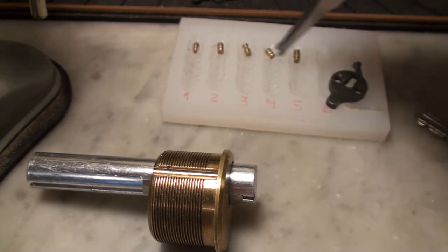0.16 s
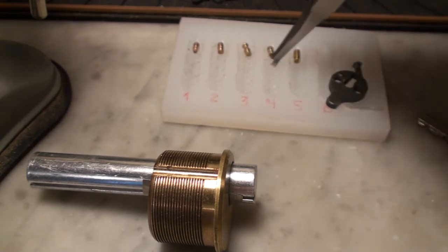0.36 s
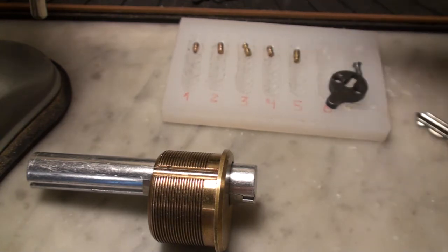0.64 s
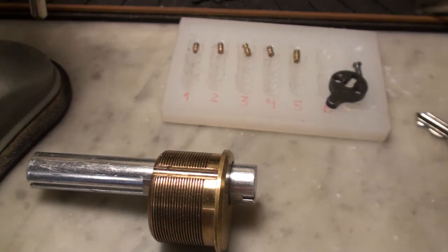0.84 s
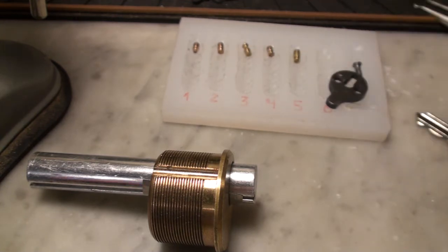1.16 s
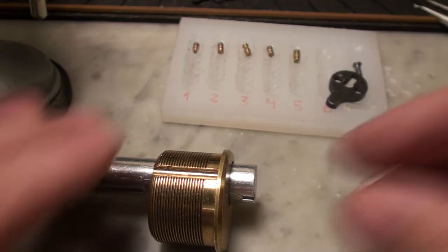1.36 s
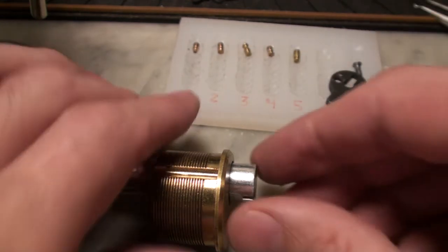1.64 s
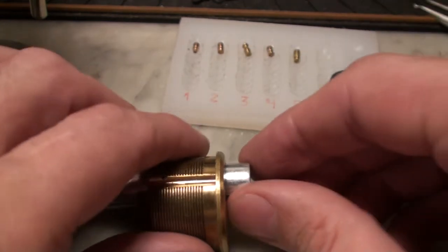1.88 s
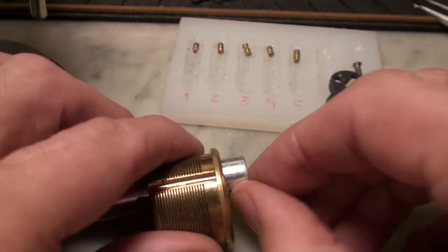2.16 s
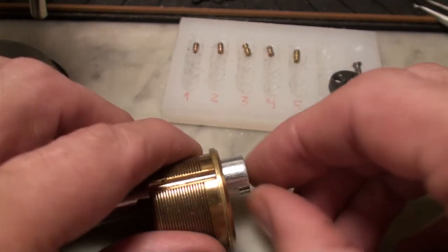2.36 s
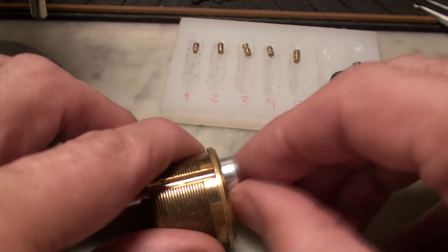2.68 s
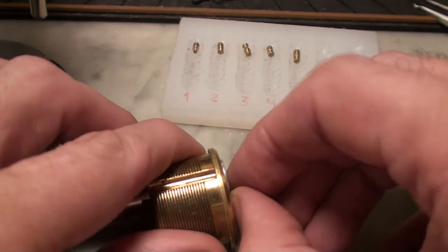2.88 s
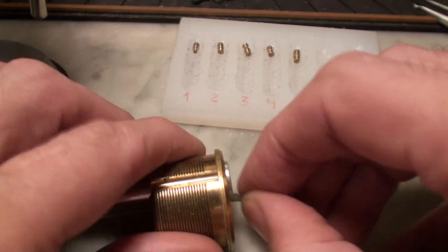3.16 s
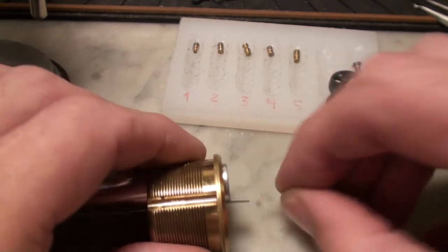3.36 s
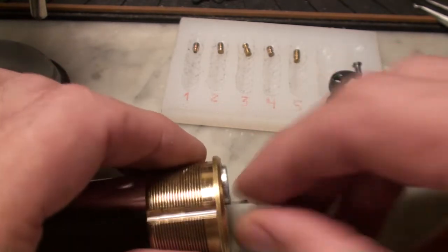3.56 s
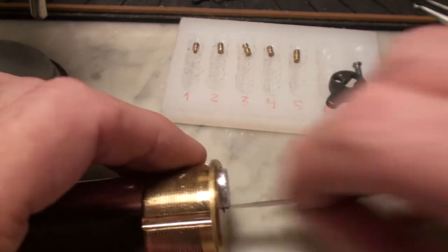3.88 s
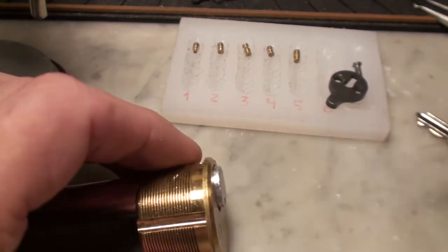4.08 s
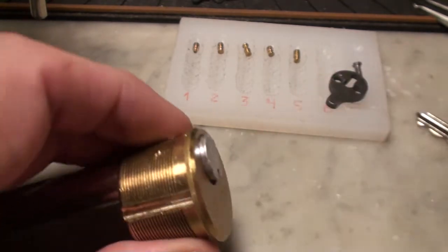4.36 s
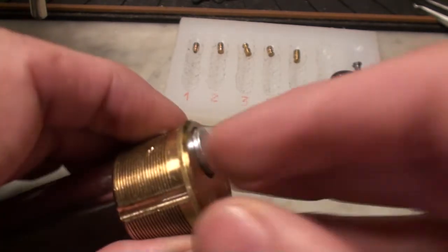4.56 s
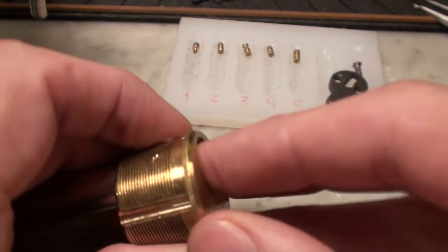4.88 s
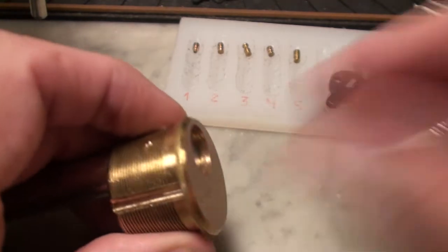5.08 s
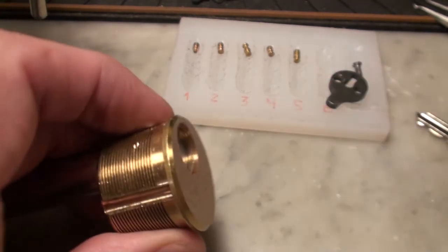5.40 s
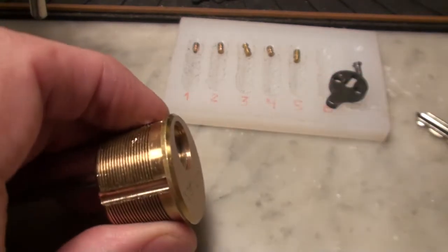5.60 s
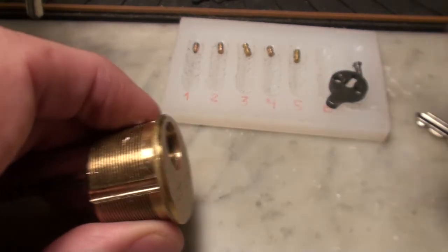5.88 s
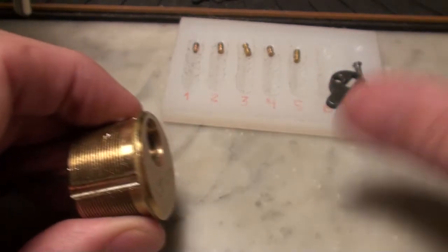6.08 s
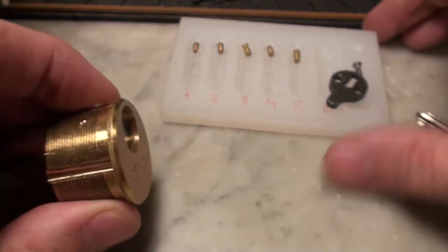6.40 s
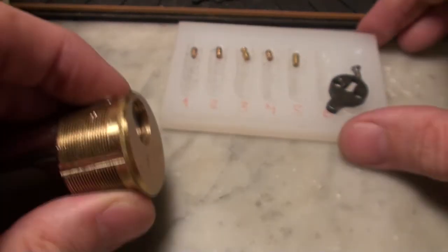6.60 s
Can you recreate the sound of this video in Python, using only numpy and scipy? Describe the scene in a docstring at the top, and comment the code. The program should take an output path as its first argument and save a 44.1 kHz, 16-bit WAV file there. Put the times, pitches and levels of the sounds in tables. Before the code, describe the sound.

Steady soft hiss, a faint fluttering fan whistle and low hum fill a small, lightly reflective room, heard close, with handling leaning right. Tiny bright tweezer ticks on plastic come at 0.3-0.45 s; skin lands dully on stone at 0.65 and brushes away. At 1.09-1.13 tweezers drop in a rapid, very bright ringing clatter, the loudest event. From 1.8 to 3.4 there are only faint finger-slip chirps, little clicks and thin metal rubs. At 3.87-3.96 sprung pins snap in a dry, crisp burst inside brass. A thin steel shim skitters over stone at 4.2-4.37. A barely audible low drone peaks near 4.5, then fades among faint touches. At 5.84-6.13 a plastic tray grinds forward, growing with gritty ticks; a shorter push follows at 6.27-6.38. A key clinks at 6.52-6.55 and faintly at 6.63.

```python
"""Close-up work on a brass lock cylinder over a stone bench in a small quiet room, a fan murmuring throughout.
Tweezer tips tick a pin into a plastic tray, a hand brushes the bench and the tweezers drop ringing on stone.
Fingers slip, brass rubs on steel, sprung pins snap in the cylinder and a tossed steel shim skitters to rest.
A soft drone swells and fades; last, the tray grinds away in two pushes and nudges a key.
Metal is ringing modes plus noise clacks; skin and grit are coloured noise; room reflections follow."""
import sys
import numpy as np
from scipy import signal
from scipy.fft import rfft, irfft
from scipy.io import wavfile
from scipy.ndimage import uniform_filter1d

SR = 44100
rng = np.random.default_rng(int(sys.argv[2]) if len(sys.argv) > 2 else 0)


def file_out(sig):
    """Save sig as 16-bit WAV at sys.argv[1]."""
    # one column per channel
    cols = np.atleast_2d(sig).T
    # limit, then scale
    lim = np.clip(cols, -1, 1)
    pcm = np.round(lim * 32767).astype(np.int16)
    wavfile.write(sys.argv[1], SR, pcm)


N = 297234
T = np.arange(N) / SR  # s

# Levels are relative: each source's own gains and pan follow. Left_right_db below 0 leans right.
# room air and microphone hiss: hz, level_db (per Hz)
AIR_SPECTRUM = [(12, -38.5), (20, -7), (49, 0), (113, -10), (154, -9), (301, -9), (328, -9), (558, -7),
                (642, -9), (738, -5.5), (1060, -7), (1220, -7), (1370, -9), (9670, -24), (16000, -30.5)]
# stereo lean of the room air: hz, left_right_db
AIR_LEAN = [(60, -22.5), (110, -15.5), (200, -2.5), (380, 2.5), (700, 3), (1290, 4.5), (2380, 4.5),
            (4400, 1.0), (8120, 1), (15000, -18)]
# touches of tweezer tips, pins, key and tray:
# start_s, click_db, click_centre_hz, ping_db, main_mode_hz, second_mode_hz, ping_t60_s
LIGHT_TOUCHES = [(0.3, -49, 8000, -47, 5900, 11150, .022), (0.329, -62, 7000, -57, 5940, 11150, .018),
                 (0.364, -58, 8000, -59, 5900, 11150, .015), (0.438, -62, 6000, -60, 5900, 11150, .015),
                 (0.87, -50, 1500, -45, 700, 2100, 0.013), (2.306, -51, 6500, -47, 6270, 10000, 0.015),
                 (2.463, -59, 4980, -58, 6200, 9900, .015), (2.705, -52, 2480, -51, 5800, 6370, .05),
                 (4.8927, -53, 3480, -49, 1000, 7400, 0.022), (5.453, -62, 4820, -53, 4910, 8330, .08),
                 (5.594, -51.5, 2500, -50.5, 3800, 4700, .04), (5.842, -40, 4400, -39, 5700, 1520, .018),
                 (5.863, -51, 5040, -52, 1520, 4440, .015), (5.891, -51, 6500, -44, 9600, 10300, 0.045),
                 (5.916, -51, 5500, -51, 9600, 12120, .03), (5.996, -47, 6500, -48, 7400, 11800, .02),
                 (6.0173, -45.5, 7000, -39, 6150, 11800, .03), (6.028, -49, 7000, -46, 10400, 12120, .05),
                 (6.116, -43.5, 7000, -39, 12080, 10400, .055),
                 (6.2736, -33.5, 4440, -37, 1600, 12700, .016), (6.283, -36.5, 5600, -43, 3300, 7400, .02)]
# skin on stone: hz, level_db (per Hz)
SKIN_SPECTRUM = [(50, -15.5), (100, -2.5), (200, -4.5), (350, 0.5), (700, -6), (2000, -11.5), (7000, -24.5),
                 (14000, -41.5)]
# tweezers bouncing on the stone: start_s, level_db, favoured_hz
TWEEZER_CONTACTS = [(1.0858, -14, 4450), (1.093, -12, 14400), (1.1035, -15, 8300), (1.108, -14.5, 4900),
                    (1.126, -21, 6400)]
# tweezer ringing: pitch_hz, level_db, t60_s (before the sustain factor), left_right_db
TWEEZER_RING = [(1130, -31, .13, -5), (2550, -23, .04, -8), (3110, -27, .08, -11), (3887, -32, .17, -11),
                (4350, -23, .15, -14), (4520, -21, .06, -10), (4902, -20, .17, -4), (5895, -25, .12, -16),
                (6862, -24, .19, -17), (7936, -13, .15, -7), (8281, 3, .13, -11), (8485, -14, .14, -9),
                (8752, -25, .16, -9), (9061, -20, .17, -13), (9343, -14, .16, -9), (11290, -22, .14, -4),
                (12185, -20, .13, -16), (13450, -23, .13, -19), (14345, -1, .1, -16),
                (14436, -16, .13, -18), (14692, -13, .14, -17)]
# dry clack of the tweezers: hz, level_db (per Hz)
TWEEZER_CLACK_SPECTRUM = [(60, -24.5), (120, -4), (220, -10), (700, 0), (2500, -2), (4500, 4.5),
                          (6500, -2.5), (8500, 5.5), (10200, -20), (11500, -3.5), (14700, 2.5),
                          (15400, -24.5)]
# dull bumps on the bench as tweezers, tray and key land or knock, and one as the cylinder's plug clicks:
# start_s, level_db, top_hz
BENCH_BUMPS = [(1.105, -46, 134.4), (4.893, -46, 490), (5.591, -56, 110.6), (6.362, -46.5, 261),
               (6.531, -52, 108), (6.626, -51.5, 92.5)]
# soft slips of skin and plastic, and one squeak of the cylinder's plug at 2.713 s: middle_s, level_db,
# pitch_hz, length_s, octave_db
GRIP_SLIPS = [(1.807, -49, 760, 0.026, -14), (2.713, -44.5, 1370, 0.019, -15),
              (3.259, -46, 747, 0.023, -18), (3.274, -52, 728, .012, 0), (3.287, -41.5, 730, 0.021, -20),
              (3.335, -47, 781, 0.019, -9), (3.348, -47, 752, .018, -11), (3.373, -53, 780, .022, -7),
              (6.025, -45.5, 685, 0.026, -15), (6.107, -42, 660, .04, -15),
              (6.383, -43.5, 340.4, .05, -6.5)]
# metal rubbing faintly inside the cylinder: start_s, level_db
CYLINDER_RUBS = [(1.992, -66.5), (2.68, -55), (4.775, -61), (4.82, -60.5), (5.416, -57)]
# brass on steel: hz, level_db (per Hz)
BRASS_SPECTRUM = [(2000, -17), (5500, -6), (8500, -14), (9700, -6), (11000, -13), (16000, -30)]
# sprung pins snapping in the cylinder: start_s, level_db, loss_per_rebound_db, favoured_hz
PIN_SNAPS = [(3.8651, -50, 4, 6960), (3.8922, -16.5, 7, 8300), (3.9012, -30, 9, 13000),
             (3.9215, -25.5, 8, 6700), (3.9344, -21.5, 5, 10300), (3.9372, -22, 20, 5250),
             (3.947, -36, 7, 5100), (3.959, -30.5, 8, 5460)]
# pin and cylinder ringing: pitch_hz, level_db, t60_s (before the sustain factor), left_right_db
PIN_RING = [(1050, -23, .022, -5), (3170, -10, .016, -9), (4300, -11, .016, -9), (5150, -9, .03, -9),
            (5560, -14, .03, -9), (6150, -9, .035, -8), (6900, -6, .02, -10), (7420, -11, .02, -9),
            (8170, -7, .016, -7), (8520, -10, .016, -7), (9400, -7, .025, -3), (9600, -5, .03, -3),
            (10250, -7, .035, -1), (11280, -9, .03, 0), (12100, -13, .03, -5)]
# dry clack of the pins: hz, level_db (per Hz)
PIN_CLACK_SPECTRUM = [(180, -68), (300, -39), (1100, -15), (1410, -35), (1970, -18.5), (2570, -17.5),
                      (3130, -13), (4160, -13.5), (6850, -4), (8790, -16), (10000, -11), (14000, -15),
                      (16000, -26)]
# shim landing and skittering to rest: start_s, level_db, loss_per_rebound_db, favoured_hz
SHIM_LANDINGS = [(4.1995, -42, 9, 8500), (4.2035, -33.5, 7, 11640), (4.214, -38, 10, 4650),
                 (4.2195, -30, 0.5, 11640), (4.23, -34, 3, 6500), (4.244, -37, 3, 11640),
                 (4.289, -40, 8, 13200), (4.3025, -38, 9, 4500), (4.3065, -39.5, 6, 13000),
                 (4.3135, -43, 5, 15500), (4.325, -43, 10, 2960), (4.342, -47, 10, 4100),
                 (4.3665, -43, 12, 14200)]
# shim ringing: pitch_hz, level_db, t60_s (before the sustain factor), left_right_db
SHIM_RING = [(2864, -24, .15, -8), (3430, -27, .15, -8), (4210, -23, .08, -10), (4650, -15, .05, -11),
             (6050, -10, .15, -16), (6160, -16, .12, -14), (7430, -9, .18, -12), (8134, -8, .12, -18),
             (8530, -18, .15, -7), (10180, -16, .15, -5), (10455, -12, .15, -2), (10902, -12, .14, -1),
             (11640, -4, .11, -17), (12360, -19, .13, -18), (13390, -14, .13, -17), (14705, -16, .13, -20),
             (15600, -7, .12, -22)]
# dry clack of the shim: hz, level_db (per Hz)
SHIM_CLACK_SPECTRUM = [(200, -25), (2000, -22), (5000, 1), (8000, 8), (9400, -11), (11500, 6), (13300, 3),
                       (14100, -11), (15600, -14)]
# pushes sliding the tray over stone: start_s, stop_s, friction_db (at the stop), swell_db_per_s
TRAY_PUSHES = [(5.843, 6.128, -46.5, 28), (6.274, 6.376, -47, -29)]
# grit under the tray: hz, level_db (per Hz)
GRIT_SPECTRUM = [(530, -30), (900, -16), (1230, 0), (1770, -7), (5550, -7), (6110, -7), (9650, -16.5),
                 (12000, -14), (16000, -28)]
# the tray's hollow body: hz, level_db (per Hz)
BODY_SPECTRUM = [(80, -6), (330, -6.5), (480, -9.5), (680, 0.5), (900, -6.5), (1400, -39.5), (4000, -60)]
# the key knocked by the tray: start_s, level_db, loss_per_rebound_db, favoured_hz
KEY_KNOCKS = [(6.5202, -27, 2.5, 12600), (6.532, -27, 5.5, 10000), (6.5435, -30, 11, 3960),
              (6.625, -37, 1.5, 1300)]
# key ringing: pitch_hz, level_db, t60_s (sustain factor 1), left_right_db
KEY_RING = [(1300, -11, .06, -3), (2920, -12, .04, -7), (3760, -5, .035, -8), (3890, -5, .035, -8),
            (4380, -13, .035, -8), (6551, -10, .12, -5), (6840, -16, .13, -8), (7660, -14, .06, -6),
            (8516, -8, .08, -1), (8726, -7, .08, -13), (10030, -2, .045, 1), (11290, -3, .065, 2),
            (11760, 3.5, .048, -5), (13003, 0, .045, -5), (14560, 0, .06, -10)]
# dry clack of the key: hz, level_db (per Hz)
KEY_CLACK_SPECTRUM = [(150, -19), (350, 10.5), (600, -5), (1300, 3), (4000, 1.5), (7000, 5.5), (9500, -4),
                      (10700, -22), (11400, -6), (12600, 1), (13800, -22), (16000, -30)]
# decay of the room's reflections: hz, t60_s
ROOM_DECAY = [(100, 0.35), (1000, 0.28), (5000, 0.32), (9000, 0.26), (15000, 0.23)]

PIN_REBOUND_S, SHIM_REBOUND_S, KEY_REBOUND_S = .0027, .0062, .0056
RESTITUTION = .92  # each rebound lasts this share of the one before
FAVOUR_OCTAVES = .15  # a contact spot most excites the modes this near its favoured pitch
TICK_WIDTH = .676  # a click's width as a share of its centre
RUB_S = .07
BUMP_CYCLES = 37  # a bump falls 60 dB in this many cycles of its top frequency
PUSH_RISE_DB_PER_S, PUSH_FALL_DB_PER_S = 348, 302
BODY_DB, BODY_SWELL_DB_PER_S = -49, 28  # the hollow body speaks more as each push goes on
BRUSH_S, BRUSH_DB, BRUSH_RISE_DB_PER_S, BRUSH_FALL_DB_PER_S = .652, -53.5, 250, 18.5
DRONE_PEAK_S, DRONE_DB, DRONE_RISE_DB_PER_S, DRONE_FALL_DB_PER_S = 4.52, -66, 12, 6
AIR_DB = -54.87
LOW_CUT_HZ, EDGE_HZ = 36, 16150


def amp(db):
    """Decibels to gain."""
    return 10 ** (np.asarray(db) / 20)


def evened(x):
    """Scales to rms 1."""
    return x / np.sqrt(np.mean(x ** 2) + 1e-20)


def read(points, hz):
    """Reads a table on a log-frequency axis."""
    f, value = np.transpose(points)
    return np.interp(np.log(hz + 1), np.log(f + 1), value)


def pan(side_db):
    """Left and right gains with a mean of 1."""
    gains = np.array([amp(side_db), np.ones_like(side_db)]).reshape(2, -1)
    return gains / gains.mean(0)


def add(mix, s, sound):
    """Mixes a sound in at time s, cut at the end of the mix."""
    part = mix[..., round(s * SR):][..., :sound.shape[-1]]
    part += sound[..., :part.shape[-1]]


def noise(size, alike):
    """Two channels of white noise; alike is the share of power they have in common."""
    z = rng.standard_normal((3, size))
    return np.sqrt(alike) * z[2] + np.sqrt(1 - alike) * z[:2]


def colour(x, points):
    """Filters by a spectrum, keeping the power of white noise."""
    gain = evened(amp(read(points, np.fft.rfftfreq(2 * N, 1 / SR))))
    return irfft(rfft(x, 2 * N) * gain)[..., :N]


def resonate(x, hz, width):
    """One fixed resonance, width in Hz."""
    return signal.lfilter(*signal.iirpeak(hz, hz / width, SR), x)


def swell(start, stop, db, rise, fall, slope=0):
    """Gain that rises until start, drifts to db at stop, then falls; rates in dB per s."""
    held = db + slope * (np.clip(T, start, stop) - stop)
    return amp(held - rise * np.maximum(start - T, 0) - fall * np.maximum(T - stop, 0))


def room_air():
    """Air and microphone hiss as coloured noise with a different stereo lean in each band."""
    lean = pan(read(AIR_LEAN, np.fft.rfftfreq(N, 1 / SR)))
    air = irfft(rfft(colour(noise(N, 0.22), AIR_SPECTRUM)) * lean, N)
    return amp(AIR_DB) * evened(air)


def fan(whistle_hz=1210, whistle_width=80, whistle_db=-65, hum_hz=87, hum_width=12, hum_db=-70):
    """A fan's fluttering whistle and low hum, both narrow resonances fed by noise."""
    waves = sum(np.sin(2 * np.pi * (hz * T + rng.random())) for hz in np.geomspace(1.5, 14, 16))
    flutter = amp(3 * evened(waves))  # 3 dB rms
    whistle = resonate(noise(N, 0.36), whistle_hz, whistle_width)
    whistle = resonate(whistle, whistle_hz, 4 * whistle_width)
    hum = resonate(resonate(noise(N, 0.7), hum_hz, hum_width), hum_hz, hum_width)
    whistle = amp(whistle_db) * pan(2) * evened(flutter * whistle)
    return whistle + amp(hum_db) * pan(-13) * evened(hum)


def drone(hz=156.5, side_db=-14.5):
    """A soft low sine that swells and fades."""
    level = swell(DRONE_PEAK_S, DRONE_PEAK_S, DRONE_DB, DRONE_RISE_DB_PER_S, DRONE_FALL_DB_PER_S)
    return pan(side_db) * level * evened(np.sin(2 * np.pi * hz * T))


def crack(t60, alike=0.8):
    """A burst of micro-contacts as decaying noise, t60 in s."""
    return noise(4096, alike) * amp(-60 * np.arange(4096) / SR / t60)


def ticks(t60=0.021, side_db=-7, top_hz=13000, upper_db=-2):
    """Small touches: a dry click with one broad resonance, and a ping of two modes."""
    out, t = np.zeros((2, N)), T[:SR // 4]
    top_cut = signal.butter(4, top_hz, fs=SR)
    for s, db, hz, ping_db, lower_hz, upper_hz, ping_t60 in LIGHT_TOUCHES:
        click = signal.lfilter(*top_cut, resonate(crack(t60), hz, TICK_WIDTH * hz))
        add(out, s, amp(db) * click / np.std(click[:, :256]))  # levelled by its opening
        ping = np.sin(2 * np.pi * lower_hz * t) + amp(upper_db) * np.sin(2 * np.pi * upper_hz * t)
        add(out, s, amp(ping_db - 60 * t / ping_t60) * ping)
    return pan(side_db) * out


def friction(per_s, spread_db, smooth):
    """Countless tiny catches of uneven size over a smooth rub."""
    sizes = amp(spread_db * np.minimum(rng.exponential(1, N), 4))
    catches = (rng.random(N) < per_s / SR) * sizes
    grip = signal.lfilter([1], [1, -np.exp(-1 / (0.00077 * SR))], catches)  # lets go in 0.77 ms
    return evened(noise(N, 0.4) * (evened(grip) + smooth))


def hand(side_db=-12):
    """Skin lands on the bench and brushes away, dull and close: coloured friction noise."""
    stroke = swell(BRUSH_S, BRUSH_S, BRUSH_DB, BRUSH_RISE_DB_PER_S, BRUSH_FALL_DB_PER_S)
    skin = friction(per_s=220, spread_db=1.5, smooth=1.3)
    return pan(side_db) * stroke * colour(skin, SKIN_SPECTRUM)


def struck(hits, modes, clack, ring_db, sustain, clack_db, clack_t60, side_db, scatter, favour_db):
    """Contacts clack, feed the modes their spot favours and jolt their phase; sustain scales each ring."""
    clacks, out = np.zeros((2, 2, N))
    body = crack(clack_t60)  # the object's many short-lived modes, the same at every contact
    for s, db, _ in hits:
        add(clacks, s, amp(db) * (body + 0.87 * crack(clack_t60 / 2)))
    times, hit_db, favoured_hz = np.transpose(hits)
    first_s = times.min()
    at = np.round((times - first_s) * SR).astype(int)
    for hz, db, t60, mode_side_db in modes:
        nearness = np.exp(-(np.log2(hz / favoured_hz) / FAVOUR_OCTAVES) ** 2)
        blows = np.zeros(SR)
        blows[at] = amp(hit_db + favour_db * nearness)
        decay = amp(-60 / (sustain * t60 * SR))  # per sample
        size = np.sqrt(signal.lfilter([1], [1, -decay ** 2], blows ** 2) + 1e-20)  # energies add
        # a blow jolts the phase more when the mode is already quiet
        jolts = np.cumsum(scatter * rng.standard_normal(SR) * blows / size) + 2 * np.pi * rng.random()
        ring = size * np.sin(2 * np.pi * hz * T[:SR] + jolts)
        add(out, first_s, pan(mode_side_db) * amp(db + ring_db) * ring)
    return out + amp(clack_db) * pan(side_db) * colour(clacks, clack)


def dropped_tweezers():
    """Tweezers bounce on the stone, their long modes struck afresh at each contact."""
    return struck(TWEEZER_CONTACTS, TWEEZER_RING, TWEEZER_CLACK_SPECTRUM, ring_db=-5, sustain=0.835,
                  clack_db=-16.5, clack_t60=0.045, side_db=-11.5, scatter=.55, favour_db=2)


def bumps(lowest_hz=60, side_db=-12):
    """Soft blows carried through the bench to the microphone: decaying low noise."""
    out = np.zeros(N)
    for s, db, top_hz in BENCH_BUMPS:
        band = signal.butter(2, [lowest_hz, top_hz], "band", fs=SR, output="sos")
        rumble = signal.sosfilt(band, rng.standard_normal(SR // 2))
        t60 = BUMP_CYCLES / top_hz
        add(out, s, amp(db) * evened(rumble) * amp(-60 * T[:SR // 2] / t60))
    return pan(side_db) * out


def slips(side_db=-5, sag=0.096, waver=0.043):
    """Short stick-slip chirps whose pitch wavers and sags as the grip relaxes."""
    out = np.zeros(N)
    for s, db, hz, length, octave_db in GRIP_SLIPS:
        size = round(length * SR)
        wander = evened(uniform_filter1d(rng.standard_normal(size), size=150))
        bend = 1 + sag * np.linspace(.5, -.5, size) + waver * wander
        turn = 2 * np.pi * np.cumsum(hz * bend) / SR
        chirp = np.sin(turn) + amp(octave_db) * np.sin(2 * turn)
        add(out, s - length / 2, amp(db) * np.hanning(size) * chirp)
    return pan(side_db) * out


def rubs(side_db=-3):
    """Thin whispers of brass sliding on steel: short swells of bright noise."""
    out, size = np.zeros((2, N)), round(RUB_S * SR)
    for s, db in CYLINDER_RUBS:
        add(out, s, amp(db) * np.hanning(size) * noise(size, 0.25))
    return pan(side_db) * colour(out, BRASS_SPECTRUM)


def rebounds(landings, gap, count=4):
    """Each landing becomes a run of contacts, ever weaker and closer together; gap in s."""
    delays = np.cumsum([0, *(gap * RESTITUTION ** np.arange(count - 1))])
    return [(s + delay, db - k * loss_db, hz)
            for s, db, loss_db, hz in landings for k, delay in enumerate(delays)]


def snapping_pins():
    """Sprung pins rebound inside the cylinder, exciting its short modes."""
    return struck(rebounds(PIN_SNAPS, PIN_REBOUND_S), PIN_RING, PIN_CLACK_SPECTRUM, ring_db=-4.5,
                  sustain=0.76, clack_db=-5, clack_t60=0.025, side_db=-11, scatter=1.15, favour_db=10)


def tossed_shim():
    """A thin steel shim rebounds on the stone, each spot favouring other modes."""
    return struck(rebounds(SHIM_LANDINGS, SHIM_REBOUND_S), SHIM_RING, SHIM_CLACK_SPECTRUM, ring_db=-3.5,
                  sustain=0.57, clack_db=-10, clack_t60=0.027, side_db=-14, scatter=1.0, favour_db=11)


def grains(per_s, spread_db, cycles, count=24):
    """Specks of grit snap one by one, each ringing at one of a set of fixed pitches."""
    out = np.zeros(N)
    for hz in np.geomspace(1100, 13000, count):
        snaps = rng.random(N) < per_s / count / SR
        train = np.zeros(N)
        train[snaps] = amp(spread_db * np.minimum(rng.exponential(1, snaps.sum()), 3))
        out += resonate(train, hz, hz / cycles)
    return evened(out)


def tray(grit_db=-4, side_db=-8, grain_db=-3):
    """Grit hisses and crackles under the sliding tray and its friction drives the hollow body."""
    drive = friction(per_s=600, spread_db=2.5, smooth=1)
    crackle = drive + amp(grain_db) * grains(per_s=900, spread_db=3, cycles=31)
    edges = PUSH_RISE_DB_PER_S, PUSH_FALL_DB_PER_S
    grit_level = sum(swell(start, stop, db, *edges, slope) for start, stop, db, slope in TRAY_PUSHES)
    body_level = sum(swell(start, stop, BODY_DB, *edges, BODY_SWELL_DB_PER_S)
                     for start, stop, _, _ in TRAY_PUSHES)
    grit = amp(grit_db) * grit_level * colour(crackle, GRIT_SPECTRUM)
    return pan(side_db) * (grit + body_level * colour(drive, BODY_SPECTRUM))


def nudged_key():
    """The key, knocked by the tray, rebounds and rings briefly."""
    return struck(rebounds(KEY_KNOCKS, KEY_REBOUND_S), KEY_RING, KEY_CLACK_SPECTRUM, ring_db=-11,
                  sustain=1, clack_db=-14, clack_t60=0.081, side_db=-9, scatter=1.3, favour_db=7.5)


def room(x, wet_db, side_db, rise_s=0.0044):
    """Dense reflections off bench and walls build up quickly and die band by band."""
    taps = noise(SR // 2, 0.47) * (rng.random(SR // 2) < .15)
    hz, t, z = signal.stft(taps, SR, nperseg=256)
    decay = amp(-60 * t / read(ROOM_DECAY, hz)[:, None])
    tail = signal.istft(z * decay, SR, nperseg=256)[1]
    tail *= 1 - np.exp(-T[:tail.shape[1]] / rise_s)
    tail /= np.linalg.norm(tail[0])
    reflections = signal.fftconvolve(x.mean(0)[None], tail, axes=1)[:, :N]
    return x + amp(wet_db) * pan(side_db) * reflections


def scene():
    """The dropped things lie off to the right; the cylinder is held near the microphone, so least wet."""
    background = room_air() + fan() + drone()
    handling = ticks() + hand() + slips() + rubs() + tray()
    airborne = room(handling, wet_db=-6.5, side_db=-11.5)
    airborne += room(dropped_tweezers(), wet_db=-5, side_db=-12)
    airborne += room(snapping_pins(), wet_db=-13, side_db=-11)
    airborne += room(tossed_shim(), wet_db=-5, side_db=-13)
    airborne += room(nudged_key(), wet_db=-9.5, side_db=-8)
    return background + airborne + bumps()


def record(dry):
    """The microphone's low cut and the recorder's band limit."""
    dry = signal.sosfilt(signal.butter(4, LOW_CUT_HZ, "high", fs=SR, output="sos"), dry)
    band_limit = signal.firwin(401, EDGE_HZ, window=("kaiser", 9), fs=SR)
    return signal.oaconvolve(dry, band_limit[None], "same")


dry = scene()
out = record(dry)
file_out(out)
```